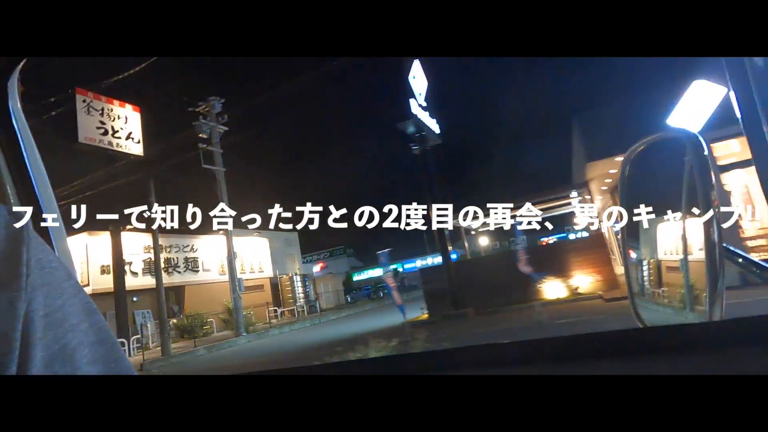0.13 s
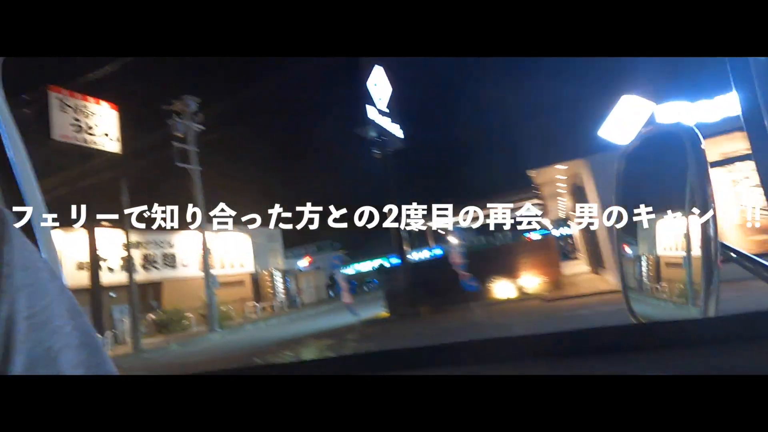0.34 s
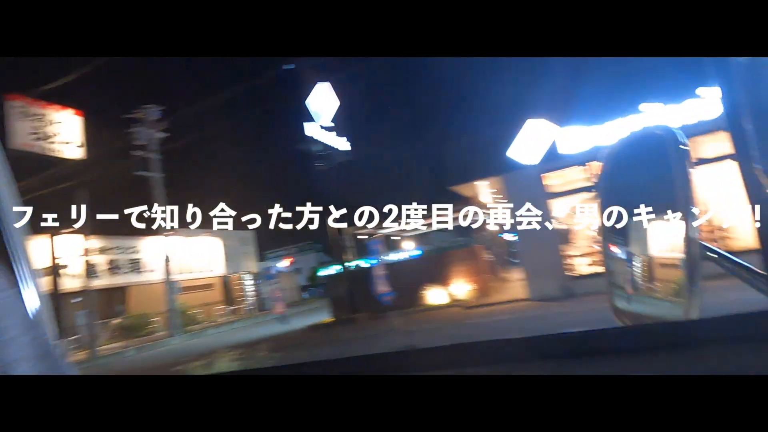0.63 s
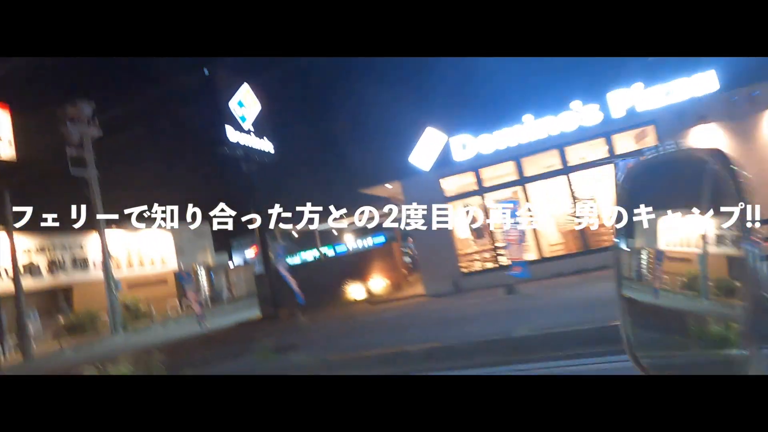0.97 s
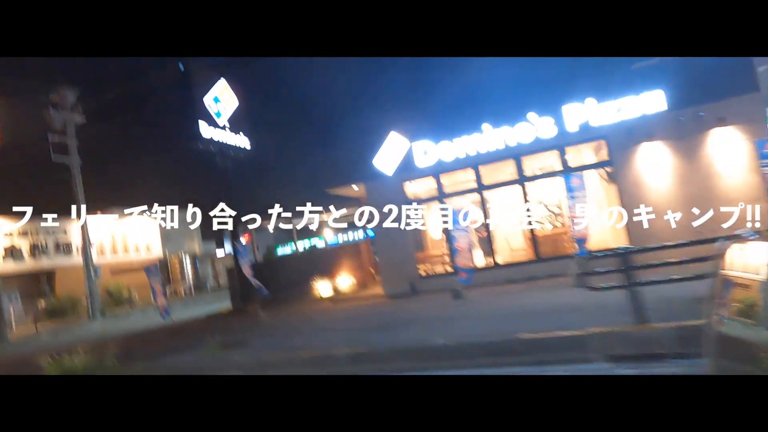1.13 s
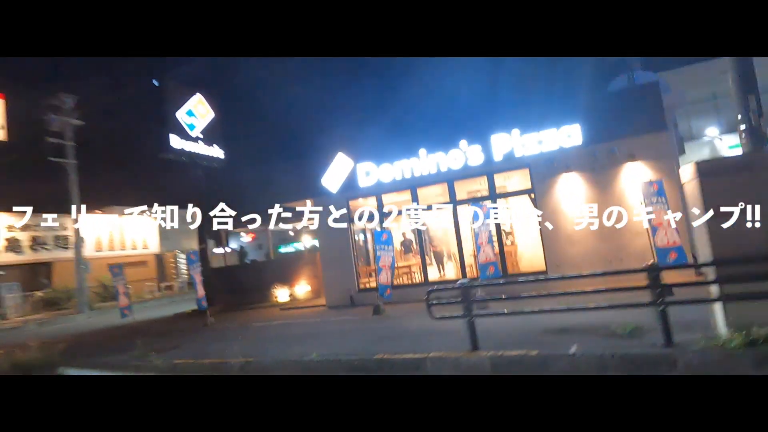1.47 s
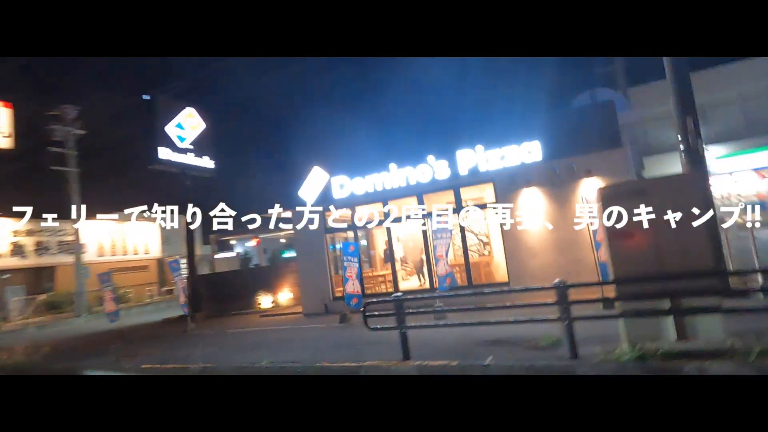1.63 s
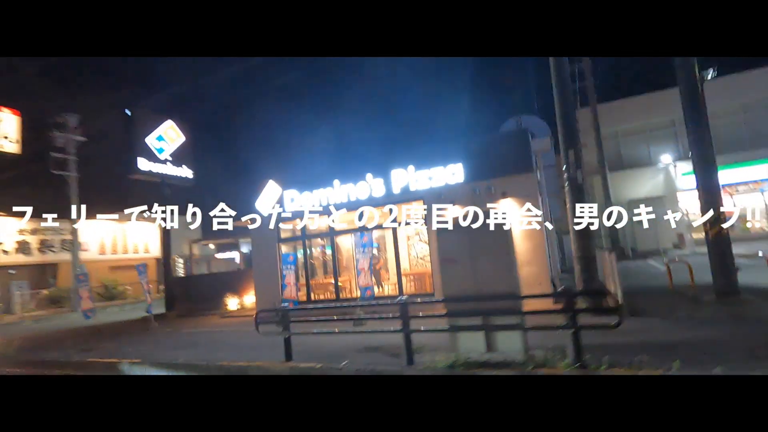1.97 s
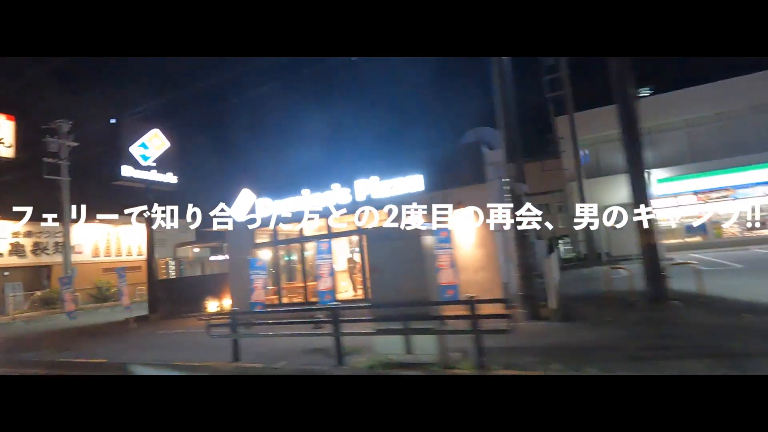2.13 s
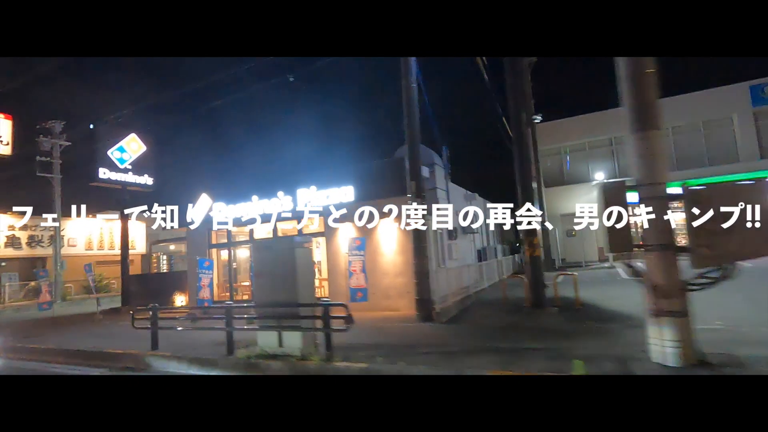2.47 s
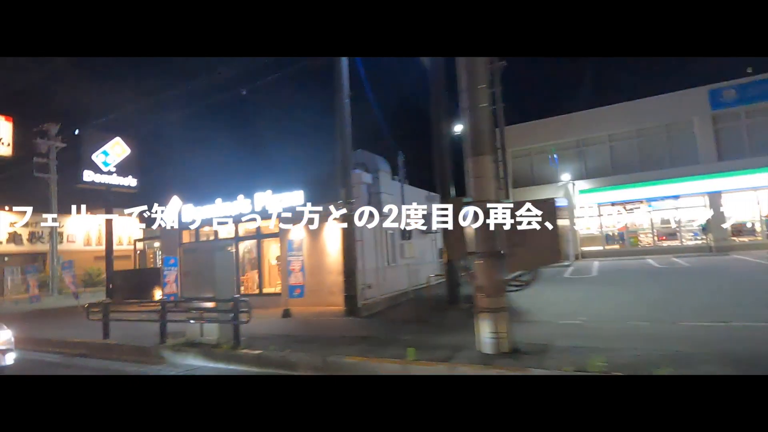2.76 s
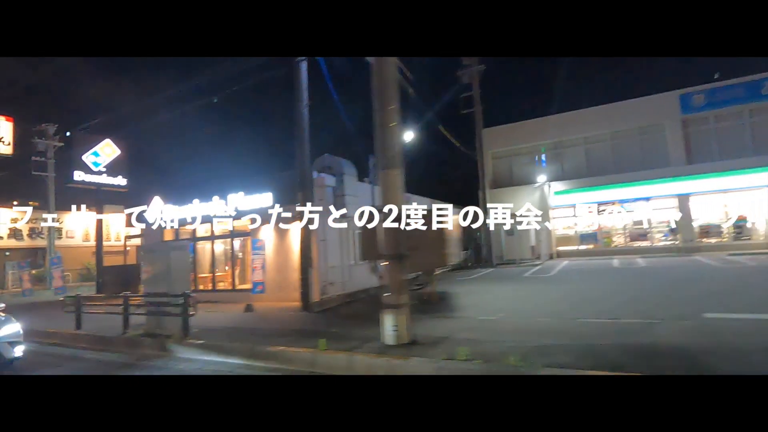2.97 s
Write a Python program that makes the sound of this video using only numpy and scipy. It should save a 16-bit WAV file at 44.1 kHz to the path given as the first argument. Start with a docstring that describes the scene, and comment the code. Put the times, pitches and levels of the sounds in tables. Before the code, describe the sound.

A small van's engine drones low and boomy, heard from the front seat, rising steadily in pitch for about three seconds over tyre rumble and a faint hum. A small loose metal piece jingles faintly at the very start. From about 1 second, a soft rush of air opens up and the engine's clatter grows. Near 2.1 seconds, something at the roadside passes with a brief, light swish.

```python
"""A four-cylinder engine behind the seats of a small van, heard inside as it gathers speed in town. Its
harmonics climb through the boomy resonances of the cabin and its clatter grows with them. The tyres rumble, hum
and ring underneath, and a rush of air opens up after a second. A small loose metal piece jingles at the start,
and roadside objects swish by."""
import sys
import numpy as np
from scipy import signal
from scipy.fft import rfft, irfft, next_fast_len
from scipy.io import wavfile

SR = 44100
rng = np.random.default_rng(int(sys.argv[2]) if len(sys.argv) > 2 else 0)


def materialize(psi):
    """Save the field psi as 16-bit PCM at rate SR to the path in sys.argv[1].

    A 1-D psi becomes a single channel; in a 2-D psi each row is a channel.
    """
    bounded = np.clip(np.atleast_2d(psi).T, -1, 1)
    quanta = np.round(bounded * 32767).astype(np.int16)
    wavfile.write(sys.argv[1], SR, quanta)


N = 136710


def from_db(db):
    """Decibels to gain."""
    return 10 ** (np.asarray(db) / 20)


def rms_one(x):
    """Scale to unit rms."""
    return x / np.sqrt(np.mean(x ** 2) + 1e-20)


def in_time(rows):
    """A control curve at every sample."""
    return np.interp(np.arange(N) / SR, *np.transpose(rows))


def at_hz(points, hz):
    """Read a spectrum on a log-frequency axis."""
    freqs, db = np.transpose(points)
    return np.interp(np.log(hz), np.log(freqs), db)


def drift(rate):
    """Slow random wander with spread 1."""
    r = np.exp(-80 * np.pi * rate / SR)
    slow = signal.lfilter([1], [1, -2 * r, r * r], rng.standard_normal(N // 40 + 2002))[2000:]
    return np.interp(np.arange(N) / 40, np.arange(len(slow)), rms_one(slow))


def noise(spectrum):
    """Noise of a given colour that falls away beyond both ends; rms 1."""
    size = next_fast_len(N)
    hz = np.maximum(np.arange(size // 2 + 1) * SR / size, 1)
    skirts = 1 / (1 + (spectrum[0][0] / hz) ** 4) / (1 + (hz / spectrum[-1][0]) ** 4)
    white = rfft(rng.standard_normal(size))
    return rms_one(irfft(white * from_db(at_hz(spectrum, hz)) * skirts, size)[:N])


def ring(clicks, hz, t60):
    """A unit click sets a sine of height 1 ringing."""
    r, w = np.exp(-np.log(1000) / (t60 * SR)), 2 * np.pi * hz / SR
    return signal.lfilter([0, np.sin(w)], [1, -2 * r * np.cos(w), r * r], clicks + 1e-18)


# The climbing revs. Each row: time in seconds, speed in rpm.
REVS = [(0.0, 1728), (0.5, 1848), (1.0, 2015), (1.5, 2163), (2.0, 2295), (2.5, 2417), (3.1, 2558)]


def engine_motion(jitter=0.0027):
    """The engine speeds up a little unevenly: its rpm and the angle of its two-turn cycle."""
    rpm = in_time(REVS)
    cycle_hz = rpm / 120 * (1 + jitter * drift(30))
    return rpm, 2 * np.pi * np.cumsum(cycle_hz) / SR


# The engine's voice. Each row: harmonic of the cycle, dB pulling lightly, dB pulling hard.
HARMONICS = [(2, -1, -2.5), (3, -0.5, -1), (4, 3.5, 3), (5, -0.5, -2), (6, -5, 0), (7, -4, -1),
             (8, 3.5, 5.5), (9, 1.5, -3), (10, -4, 2.5), (11, 3, -7), (12, 4.5, -1), (13, 0.5, 1.5),
             (14, 3, -4.5), (15, -1, -1.5), (16, 1.5, 0.5)]
# The cabin's boom. Each row: frequency in Hz, gain in dB.
CABIN = [(29, -27.5), (34, -21), (39, -32), (43, -39), (50, -28), (62, -44), (76, -28.5), (90, -43),
         (102, -33), (115, -33), (125, -28), (136, -25), (153, -41), (166, -34.5), (180, -34.5), (204, -32),
         (222, -46.5), (245, -43), (268, -42.5), (285, -47.5), (315, -43), (360, -60.5), (450, -59.5),
         (700, -60), (1300, -79.5)]
# The swell with the revs. Each row: frequency in Hz, dB gained per 1000 rpm.
GROWTH = [(60, 6.5), (130, 6.5), (190, 10.5), (260, 21.5), (400, 16.5), (1000, 0)]


def engine_drone(rpm, angle, pull_s=1.355, pull_rise_s=0.046, waver_db=1.34, waver_hz=3.5):
    """Wavering harmonics climb through the cabin's resonances; a harder pull shifts their balance."""
    pull = .5 + .5 * np.tanh((np.arange(N) / SR - pull_s) / pull_rise_s)
    strength_db = {round(k): light + (hard - light) * pull for k, light, hard in HARMONICS}
    krpm_above_mean = (rpm - rpm.mean()) / 1000
    drone = np.zeros(N)
    for k in range(2, 60):
        hz = k * rpm / 120
        db = at_hz(CABIN, hz) + strength_db.get(k, 0) + at_hz(GROWTH, hz) * krpm_above_mean
        db += waver_db * drift(waver_hz)
        drone += np.sqrt(2) * from_db(db) * np.sin(k * angle + 2 * np.pi * rng.random())
    return drone


# The clatter's fader. Each row: time in seconds, level in dB.
CLATTER_LEVEL = [(0, -37), (.5, -43.5), (.75, -41), (.95, -36.5), (1.25, -37), (1.55, -34.5), (2.2, -35.5),
                 (2.5, -33.5), (3.1, -33.5)]
# Its boxy colour. Each row: frequency in Hz, gain in dB.
CLATTER_EQ = [(200, -8.5), (300, 5), (385, 4.5), (440, 1), (505, 3.5), (550, -0.5), (620, 1.5), (750, -3.5),
              (1050, -4.5), (1400, -10.5), (2000, -27), (3500, -33)]


def engine_clatter(angle, turn_depth=0.06, firing_depth=0.28):
    """Mechanical noise through the engine cover, pulsing with the turns and the firings."""
    crank = 2 * angle
    pulsing = 1 + turn_depth * np.cos(crank) + firing_depth * np.cos(2 * crank)
    return from_db(in_time(CLATTER_LEVEL)) * rms_one(noise(CLATTER_EQ) * pulsing)


# Faders for deep body shake, tyre rumble and tread hum. Each row: time in seconds, level in dB.
SHAKE_LEVEL = [(0, -17.5), (.11, -16), (.175, -21), (.235, -14), (.3, -24), (.7, -19), (.85, -22.5),
               (1.05, -18.5), (1.35, -20.5), (1.5, -34.5), (1.7, -30.5), (2.05, -23), (2.3, -26.5),
               (2.65, -24.5), (3.1, -20)]
RUMBLE_LEVEL = [(0, -30), (.4, -22.5), (.7, -27.5), (.87, -21.5), (1.05, -27), (1.25, -25), (1.7, -25.5),
                (2.2, -28.5), (2.65, -25), (3.1, -29.5)]
TREAD_LEVEL = [(0, -45.5), (.3, -43.5), (.65, -43.5), (1, -43), (1.3, -40.5), (1.6, -39), (2, -38.5),
               (2.3, -38.5), (3.1, -42)]
# Their colours, from sub-bass to midrange. Each row: frequency in Hz, gain in dB.
SHAKE_EQ = [(14, -10), (25, -6), (40, -5), (53, 0), (63, -2), (74, 1), (90, -7)]
RUMBLE_EQ = [(85, -3.5), (122, 3), (155, -5.5), (195, -7), (235, -11), (300, -16), (370, -36.5), (500, -29)]
TREAD_EQ = [(500, -19.5), (640, -5), (710, -2.5), (780, -1), (920, -3.5), (1200, -9), (1600, -22)]


def tyres():
    """The rolling tyres shake the body, rumble and hum with their tread."""
    layers = (SHAKE_LEVEL, SHAKE_EQ), (RUMBLE_LEVEL, RUMBLE_EQ), (TREAD_LEVEL, TREAD_EQ)
    return sum(from_db(in_time(level)) * noise(colour) for level, colour in layers)


# A faint note in the tyres. Each row: time in seconds, pitch in Hz, level in dB.
TYRE_RING = [(0, 664.2, -44), (.27, 665, -45), (.55, 662.5, -57), (.95, 655, -42), (1.3, 689.7, -50),
             (1.601, 711.4, -45.5), (2.0, 719.2, -41.5), (2.349, 706, -48), (2.72, 701, -43.5),
             (3.1, 714, -53)]


def tyre_ring(width_hz=13):
    """A narrow, unsteady resonance of the tyres creeps upward as they roll faster."""
    seconds, hz, db = np.transpose(TYRE_RING)
    phase = 2 * np.pi * np.cumsum(in_time(np.c_[seconds, hz])) / SR
    tone = drift(width_hz) * np.cos(phase) + drift(width_hz) * np.sin(phase)
    return from_db(in_time(np.c_[seconds, db])) * rms_one(tone)


# Faders for the air's rush, fine hiss and top sizzle; the hiss also swells briefly near 0.97 s and 1.14 s as
# roadside objects swish past. Each row: time in seconds, level in dB.
RUSH_LEVEL = [(0, -52.5), (.65, -51), (.82, -52.5), (.97, -46.5), (1.08, -48), (1.2, -46), (1.55, -44),
              (1.85, -44), (2.05, -42.5), (2.2, -44), (2.7, -43), (3.1, -42)]
HISS_LEVEL = [(0, -67.5), (.65, -67), (.84, -67.5), (0.972, -60), (1.08, -64), (1.14, -59.5), (1.25, -64),
              (1.5, -61), (2.0, -61), (2.35, -64), (2.7, -62), (3.1, -61.5)]
SIZZLE_LEVEL = [(0, -85.5), (1.05, -82), (1.25, -84), (1.5, -77), (2.1, -80), (2.35, -78), (3.1, -78.5)]
# Their colours, each brighter than the last. Each row: frequency in Hz, gain in dB.
RUSH_EQ = [(700, 1), (1500, 5.5), (2200, 0.5), (3000, -1.5), (4400, -6), (5500, -16), (8000, -30),
           (11000, -33.5)]
HISS_EQ = [(4000, 4.5), (6000, 0.5), (8300, -3), (9000, -9.5), (10100, -11), (10700, -23), (13000, -33)]
SIZZLE_EQ = [(10500, -20.5), (11500, -7.5), (12600, 0), (14000, -6.5), (15300, -11.5)]


def rushing_air(angle, flutter_db=0.48, pulse_depth=0.059):
    """Rushing air, faintly pulsing with the crankshaft, topped by a fine hiss."""
    rush_db = in_time(RUSH_LEVEL) + flutter_db * drift(21)
    rush = from_db(rush_db) * noise(RUSH_EQ) * (1 + pulse_depth * np.cos(2 * angle))
    hiss = from_db(in_time(HISS_LEVEL)) * noise(HISS_EQ)
    sizzle = from_db(in_time(SIZZLE_LEVEL)) * noise(SIZZLE_EQ)
    return rush + hiss + sizzle


# The bright colour of the pass-by. Each row: frequency in Hz, gain in dB.
SWISH_EQ = [(1800, -0.5), (2700, -1), (3250, -5.5), (3700, 4), (4100, -10), (5500, -13.5), (7000, -17.5),
            (8400, -16.5), (9200, -30)]


def roadside_swish(pass_s=2.128, peak_db=-43.5, rise_s=0.062, fall_s=0.015):
    """Something at the roadside throws back a hiss that swells on approach and drops once passed."""
    t = np.arange(N) / SR - pass_s
    swell = np.exp(-np.abs(t) / np.where(t < 0, rise_s, fall_s))
    return from_db(peak_db) * swell * noise(SWISH_EQ)


# Light taps of loose metal. Each row: start in seconds, level in dB.
TAPS = [(.037, -49), (.042, -58), (.049, -55), (.058, -62), (.066, -59), (.1, -60), (0.307, -63)]
# The metal's ring. Each row: pitch in Hz, gain in dB, seconds to fade by 60 dB.
METAL_MODES = [(6700, -15, .04), (7000, -12, .05), (7420, -13, .09), (7650, -15, .11), (8500, -14, 0.071)]
# The scratchy edge of a tap. Each row: frequency in Hz, gain in dB.
SCRATCH_EQ = [(5500, -1), (7000, 4), (8300, -1), (9500, -6), (11000, -11), (12700, -5), (14000, -13)]


def metal_jingle(scratch_db=-6, rise_s=0.002, fall_s=0.01):
    """Light contacts scratch a small metal piece and set its modes ringing."""
    starts, tap_db = np.transpose(TAPS)
    clicks = np.zeros(N)
    clicks[(starts * SR).astype(int)] = from_db(tap_db)
    ringing = sum(ring(clicks, hz, t60) * from_db(db) for hz, db, t60 in METAL_MODES)
    fall, rise = np.exp(-1 / (fall_s * SR)), np.exp(-1 / (rise_s * SR))
    contact = signal.lfilter([1 - rise], np.poly([fall, rise]), clicks + 1e-18)
    return ringing + from_db(scratch_db) * contact * noise(SCRATCH_EQ)


def scene():
    """Engine, road and air as heard from the front seat."""
    rpm, angle = engine_motion()
    engine = engine_drone(rpm, angle) + engine_clatter(angle)
    return (engine + tyres() + tyre_ring() + rushing_air(angle) + roadside_swish() + metal_jingle())[None]


def record(dry):
    """A steep low-pass trims the very top."""
    cutoff_hz = 15300
    return signal.sosfilt(signal.ellip(10, .1, 80, cutoff_hz, fs=SR, output="sos"), dry)


dry = scene()
out = record(dry)
materialize(out)
```